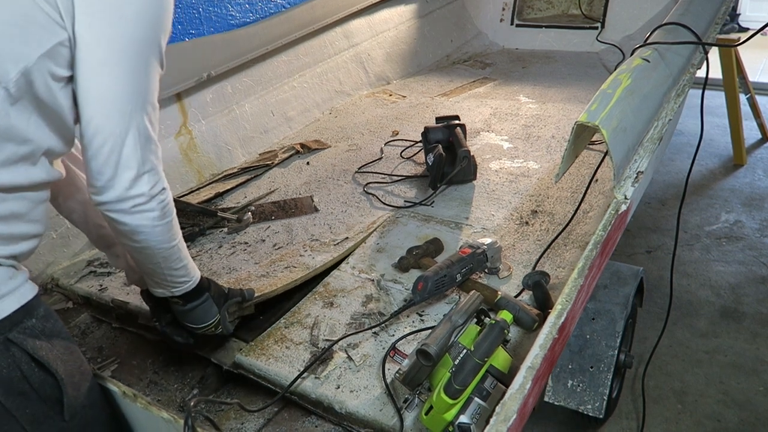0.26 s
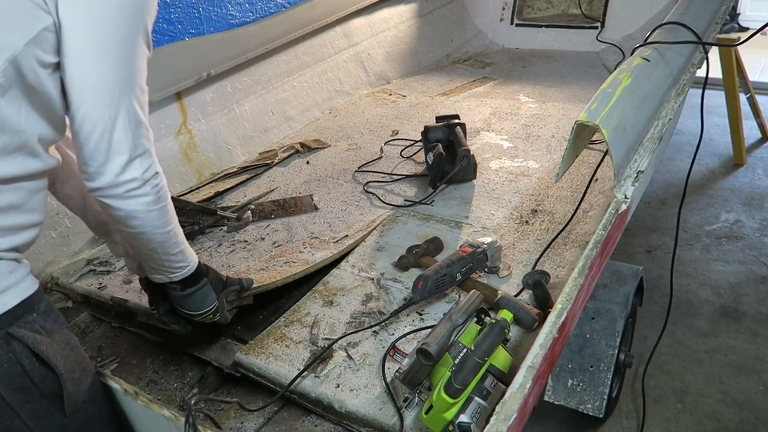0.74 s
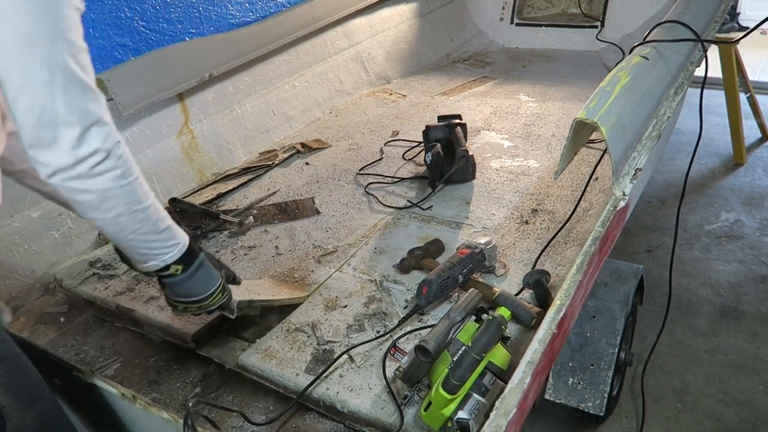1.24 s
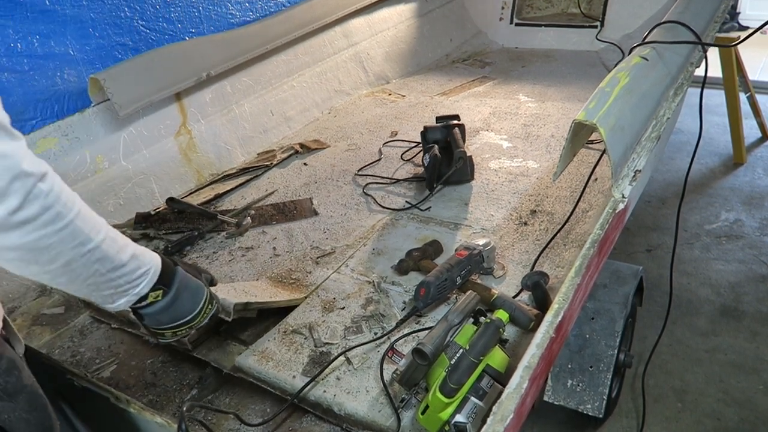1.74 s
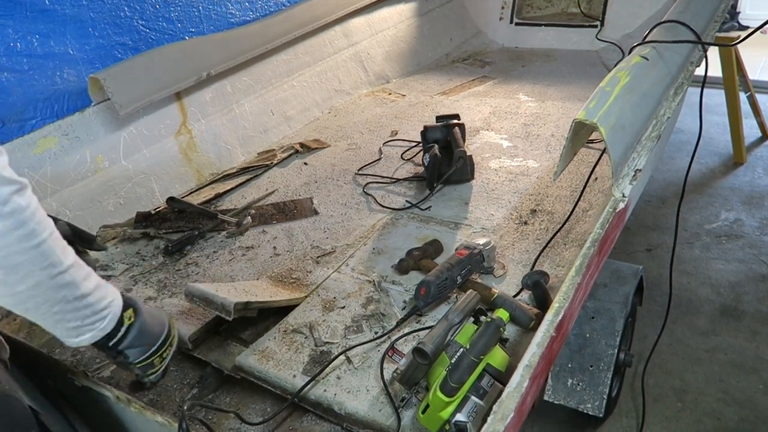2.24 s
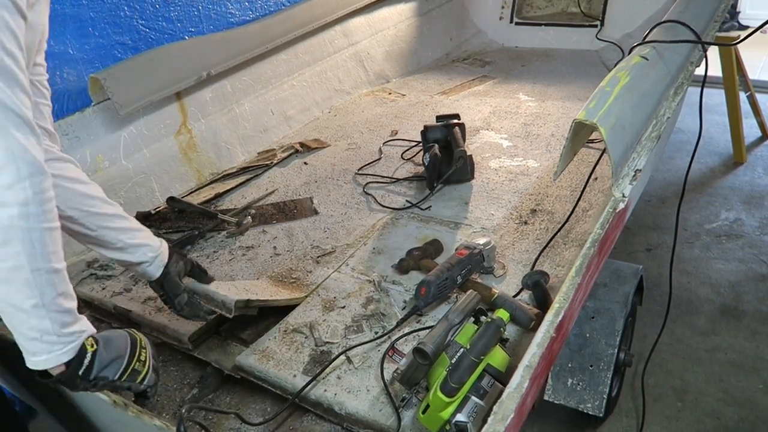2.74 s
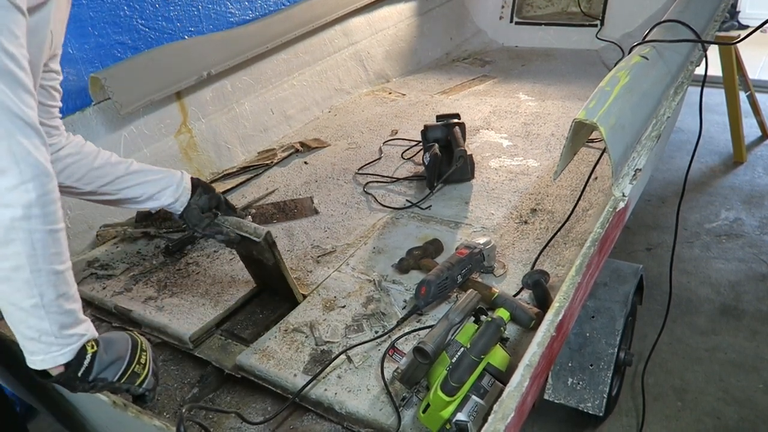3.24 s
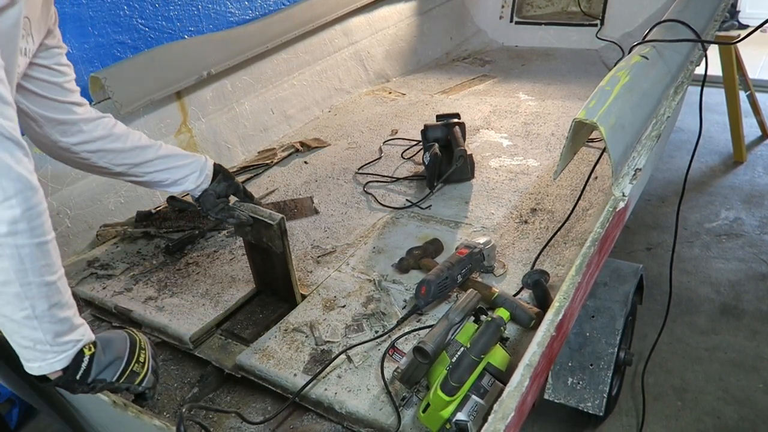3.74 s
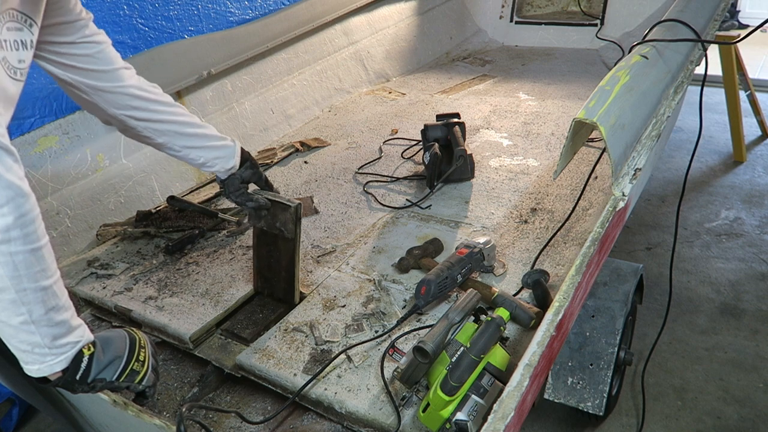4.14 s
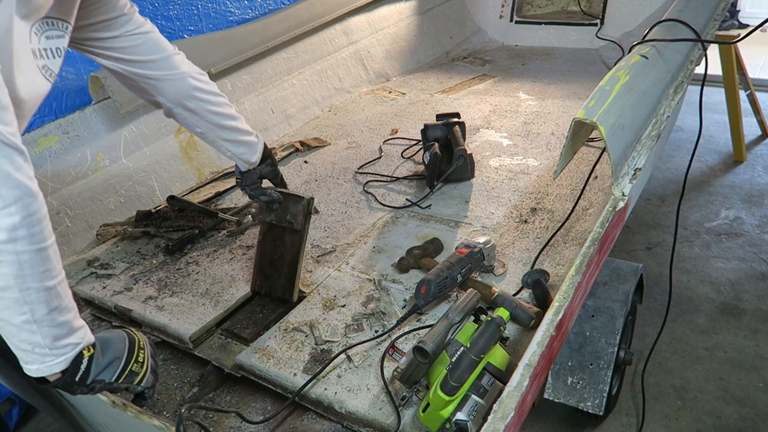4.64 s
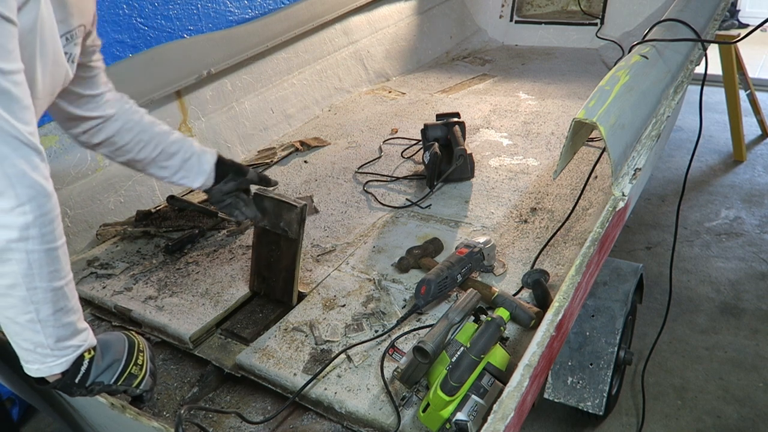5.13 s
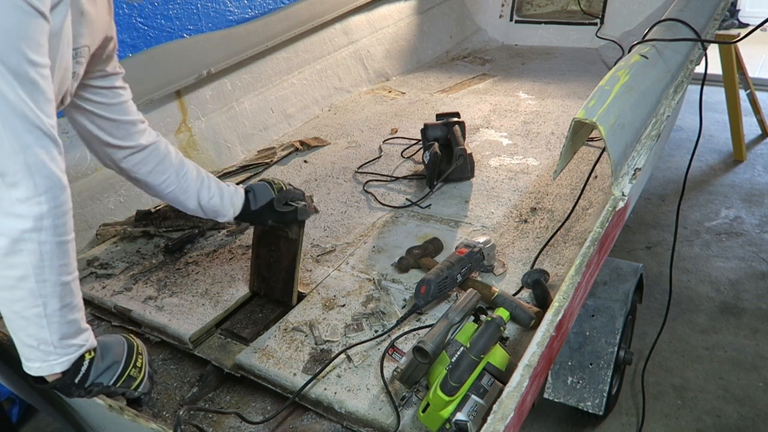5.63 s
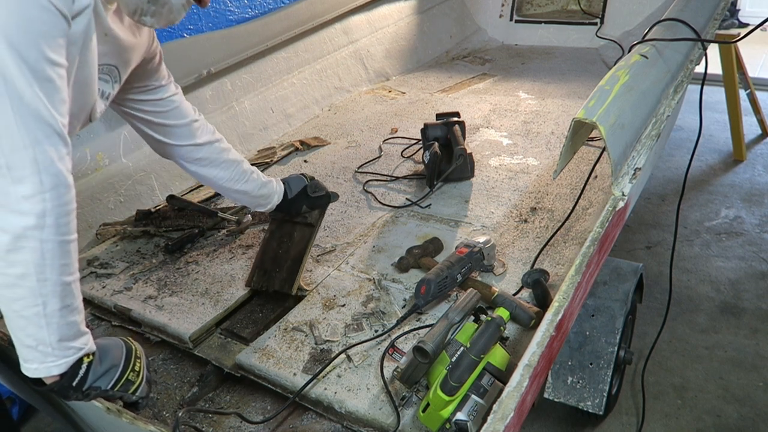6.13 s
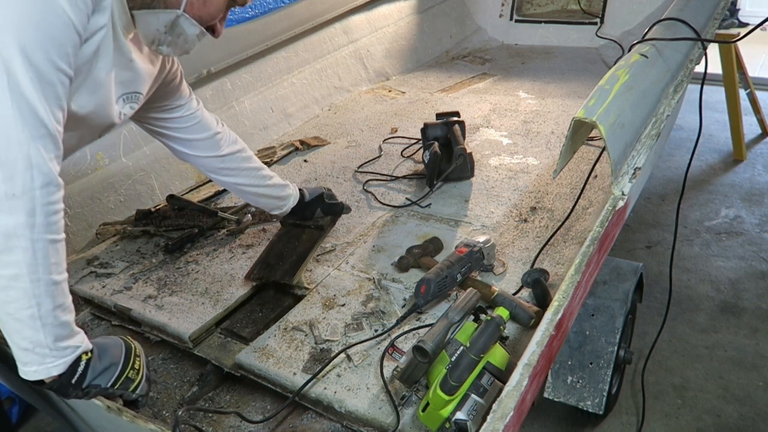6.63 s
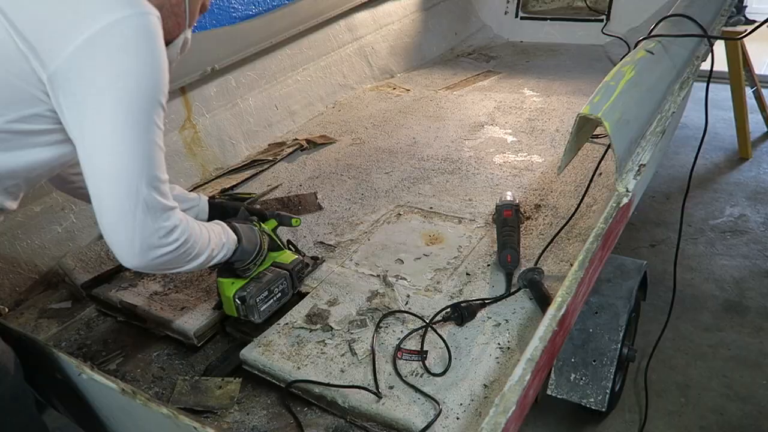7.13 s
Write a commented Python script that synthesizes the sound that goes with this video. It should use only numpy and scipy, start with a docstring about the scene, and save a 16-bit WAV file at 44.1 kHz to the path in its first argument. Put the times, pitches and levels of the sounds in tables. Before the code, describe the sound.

Rotten planks crack, splinter and tear loose from a hollow hull in a live workshop, pausing midway, then cutting to a quiet scrape.

```python
"""Prying rotten planks from a hull

Gloved hands pry deck planks out of an open hull in a bare workshop. Coloured crackle makes the tearing fibres,
short noise bursts the snaps and rips; further crackle and bursts of noise drive the resonances of the boards.
Shaped low noise makes the hull boom, decaying noise the answering walls, and sines the humming lamp.
Near the end the scene jumps to a quiet moment in which a tool is shifted on the deck.
Two close microphone ports pick it up; the loudest snaps overload them."""
import sys
import numpy as np
from scipy import signal
from scipy.fft import rfft, irfft, next_fast_len
from scipy.io import wavfile
from scipy.ndimage import uniform_filter1d, map_coordinates

SR = 44100
rng = np.random.default_rng(int(sys.argv[2]) if len(sys.argv) > 2 else 0)


def gain_from_db(level_db):
    """Turn a decibel level (scalar or array-like) into a linear amplitude factor."""
    decades = np.asarray(level_db, float) / 20
    return 10 ** decades


def pcm_store(signal):
    """Save signal as 16-bit PCM."""
    levels = np.round(np.clip(np.atleast_2d(signal), -1, 1) * 32767)
    wavfile.write(sys.argv[1], SR, levels.astype(np.int16).T)


N = 325458
TIME_S = np.arange(N) / SR

CHANGE_S = 2.0  # the hands move on from the wide plank to the short board
JUMP_S = 7.187  # the jump to the quiet moment

# Tearing and scraping, one list a bout. Each row: time in seconds, fibre level in dB, groan of the wood in dB.
TEARING_BOUTS = [
    [(0.0, -54.5, -54), (0.1, -57.5, -81), (0.2, -25, -31.5), (0.305, -46, -37), (0.35, -42.5, -24.5),
     (0.43, -51.5, -34), (0.47, -31.5, -39), (0.56, -29, -37), (0.68, -29, -28), (0.83, -49, -60),
     (0.845, -25, -37), (0.92, -25, -30), (1.0, -65, -22), (1.04, -37, -24.5), (1.1, -43.5, -33.5),
     (1.3, -54, -43.5), (1.45, -74.5, -60.5)],
    [(3.05, -62, -70), (3.14, -35.5, -36.5), (3.27, -41.5, -37.5), (3.38, -35, -32.5), (3.47, -43, -44),
     (3.55, -36.5, -39), (3.62, -41, -47), (3.68, -35, -35), (3.9, -35, -41), (3.98, -28, -31.5),
     (4.07, -26.5, -19.5), (4.12, -29, -38), (4.15, -29.5, -32), (4.39, -26.5, -21.5), (4.45, -28, -34.5),
     (4.64, -32.5, -29), (4.7, -41, -39), (4.72, -28.5, -39), (4.8, -29.5, -28.5), (4.89, -20.5, -28.5),
     (5.0, -32, -33.5), (5.15, -42.5, -63), (5.2, -28.5, -25), (5.26, -24, -27), (5.34, -37.5, -39),
     (5.49, -51, -83)],
    [(5.5, -55.5, -91), (5.78, -53.5, -42), (5.88, -58, -49), (5.95, -44.5, -28), (6.03, -26.5, -33),
     (6.14, -32.5, -29), (6.24, -19, -32), (6.29, -31.5, -28.5), (6.33, -24, -34), (6.38, -31.5, -35),
     (6.45, -28.5, -39), (6.63, -49.5, -64), (6.66, -36.5, -38.5), (6.79, -42.5, -58), (6.86, -30, -32),
     (7.02, -34, -44.5), (7.17, -28.5, -35.5)],
    [(7.2, -51, -53), (7.27, -49, -35.5), (7.316, -37.5, -54), (7.38, -45, -57)],
]
# Colour of each bout. Each row: start in seconds, treble shelf in dB, voice of the opening split in Hz,
# edge in Hz below which the fibres are thin.
BOUT_COLOURS = [(0, 4, 1900, 300), (3.0, 9, 2388, 600), (5.5, 8, 2250, 1500), (7.19, -6.5, 1807, 298.5)]
# Spectrum of parting fibres. Each row: frequency in Hz, relative density in dB per Hz.
FIBRE_SPECTRUM = [(240, -4), (400, -8.5), (445, -9.5), (569, -8), (849, -3), (2100, -12.5), (3880, -11.5),
                  (5600, -17.5), (11900, -23), (14100, -33), (15700, -49.5)]
# Bands the wood grain favours. Each row: centre in Hz, width in Hz, lift in dB.
GRAIN_BANDS = [(1660, 800, 3), (2120, 95, 4.5), (2850, 600, 1), (3600, 330, 0.5), (5300, 810, 2)]
SPLIT_WANDER_OCTAVES = 0.15

# Short snaps. Each row: start in seconds, nominal peak in dB, knock in the wood in dB against the splinters,
# splinter pitch in Hz, treble shelf in dB.
SNAPS = [(0.4419, -14.5, -23, 1580, 1.5), (0.585, -20, 2, 2000, 8.5), (0.6203, 8, -7, 2700, -3),
         (0.962, -3.5, -1, 3060, 1.9), (0.9706, 4.5, -6, 2925, -8), (0.9757, 8.5, -1.5, 2430, -12),
         (1.0392, -18.5, 13, 1150, -22), (1.1911, -37.5, -22.5, 5410, 3), (3.0733, -33, -23, 1856, 0),
         (3.4595, -22.5, -1.5, 1770, 7), (3.6365, -26, -12, 1400, 15), (3.795, -16.5, 0.5, 1420, 11),
         (3.9192, -19.5, -26, 3210, 19.5), (4.245, -13.5, -18, 2670, 15.5), (4.3998, -3, -23, 6300, 20.5),
         (4.7101, -15, -16, 2360, 16), (4.8798, -1.5, -35, 2820, 7.5), (5.0627, -17, -13, 2350, 10.5),
         (5.1979, -3.5, 2, 2970, -10), (5.5732, -36.5, -33, 4920, 6), (5.7074, -32.5, -19, 1820, 2),
         (6.2386, -6.5, -11, 2050, -5), (6.3432, -2.5, -42, 5530, 25), (6.35, -9.5, -39, 5617, 15.5),
         (6.4275, -16, -63, 3100, 15.5), (6.4332, 5, -11, 2230, -1), (6.6992, -24.5, -20, 3260, 20),
         (6.7943, -24, -24, 4450, 12.5), (6.8443, -2, -16.5, 2730, 9), (6.9656, -16.5, -23, 3150, 13.5),
         (7.0807, -5, -12, 1990, 18), (7.1302, -4, -40, 1960, 16)]
# Drawn-out rips. Each row: start in seconds, nominal peak in dB, knock in the wood in dB against the splinters,
# splinter pitch in Hz, treble shelf in dB.
RIPS = [(0.1323, -23, -23, 2300, 9.5), (0.167, -19.5, -23, 2430, -0.8), (0.1994, -7.5, -6.5, 2480, 6.5),
        (0.3149, -11.5, 6, 1140, -29.5), (0.33, -25, 16.5, 800, -30.5), (0.4561, -8.5, -30, 1486, -17),
        (0.8438, -11, 2, 1630, -0.5), (0.901, -3.5, -4, 2360, -5.5), (3.0904, -18, -10.5, 2770, 2),
        (3.1606, -27, -23, 1740, 6.5), (3.2741, -14.5, -30, 5800, -3.6), (3.3392, -21, -15, 2565, 13.5),
        (3.5259, -27, -21, 2600, 5.6), (3.686, -16, -8, 3600, 0.5), (3.7711, -21, -2.5, 1790, 12.5),
        (3.972, -11.5, 1, 2360, 1.5), (4.0173, -10.5, -4, 3140, 7.5), (4.0708, -16, -23, 3600, 1.5),
        (4.141, -8.5, -2, 1600, 13.5), (4.3077, -6.5, -4, 2120, -1.9), (4.3795, -10.5, -10, 2060, 2),
        (4.5499, -16.5, -3, 2240, 6), (4.6098, -14.5, -6, 1740, -1.5), (4.7543, -16.5, -20, 3030, -0.5),
        (4.8989, -8.5, -9, 2700, 7.5), (5.1752, -6.5, -6.4, 1813, -2), (5.8802, -38.5, 2.5, 1360, 18.5),
        (5.9, -31, 4.5, 1430, -15), (5.9554, -18, -3.5, 2850, 2.5), (6.0188, -11, -8, 2000, 5),
        (6.1801, -11.5, -37, 5800, 27), (6.4367, -8, -29, 2630, -8), (6.848, -13, -30, 5170, 8)]
# The wide plank, which breaks first. Each row: mode in Hz, width in Hz, relative level in dB.
WIDE_PLANK_MODES = [(114.8, 11, -12.5), (151, 6.7, -5.5), (233.3, 59, 2), (378, 46, 2.5), (426, 78, 2.5),
                    (583, 87, 0.5), (667.5, 69, -2.5), (860, 49, -0.5), (1160, 280, -18)]
# The short board. Each row: mode in Hz, width in Hz, relative level in dB.
SHORT_BOARD_MODES = [(170.6, 19, -9), (228.6, 27, 1), (394, 79, -1.76), (569.4, 36, -1.5), (685, 94, -9),
                     (950, 34, -10), (1208, 40, -9)]
SNAP_RISE_S, RIP_RISE_S = 0.00059, 0.0041
SNAP_FALL_S, RIP_FALL_S = 0.013, 0.055  # time for the envelope to fall by 20 dB
PLANK_THIN_HZ, BOARD_THIN_HZ = 248, 910  # below this the splinters are thin
KNOCK_EDGE_HZ = 5900  # upper edge of a knock at 0 dB treble; the break's treble moves it
CREST_DB = 2.5  # allowance for the peak of a burst over its rms
# The first hard fibre to part: level against the nominal peak, then dB gained per dB of treble
SNAP_TICK_DB, RIP_TICK_DB, TICK_FOLLOWS = -3, -3.5, 0.17

# A nail twangs as it slips in the board. Each row: start in seconds, level in dB.
NAIL_SLIPS = [(7.081, -21), (7.131, -19)]
# Partials of the nail. Each row: frequency in Hz, relative level in dB.
NAIL_PARTIALS = [(2090, 1.5), (4200, -11), (5400, -14.5)]
NAIL_DRIFT = 0.1  # radians a sample, random

# Pushes on the hull from hands, feet or a break. Each row: start in seconds, level in dB, hold in seconds.
HULL_PUSHES = [(0.0, -36.5, 0.017), (0.27, -29, .12), (0.61, -31, 0.022), (0.8, -47, 0.11),
               (0.99, -23.5, 0.023), (1.11, -27.5, 0.041), (1.3, -42, 0.045), (1.5, -55.5, 0.2),
               (2.9, -60, .05), (3.35, -44, 0.059), (4.15, -52, .2), (4.4, -41, 0.047), (4.85, -44, .03),
               (5.06, -42, 0.018), (5.28, -34.5, 0.017), (5.79, -44, 0.045), (5.98, -26, 0.033),
               (6.1, -46, 0.14), (6.54, -49, 0.037), (7.2, -37.5, 0.11)]
# Spectrum of the hull. Each row: frequency in Hz, relative density in dB per Hz.
HULL_SPECTRUM = [(19, -39), (32, -18.5), (59, 14.5), (91, 5), (140, 4.5), (160, 7.5), (210, -31),
                 (350, -120)]
PUSH_RISE_DB_PER_S, PUSH_FALL_DB_PER_S, HULL_REST_DB = 252.5, 150, -65

# Bits of rot dropping on the deck. Each row: start in seconds, click peak in dB before colouring.
CRUMBS = [(1.5191, -41.5), (1.5488, -49), (1.7205, -45.5), (1.8785, -56.5)]
# Cloth brushing. Each row: centre in seconds, level in dB, half length in seconds.
SLEEVE_BRUSHES = [(2.16, -63, .06), (2.7, -64, .045), (2.48, -72, .05)]
# Spectrum of the cloth. Each row: frequency in Hz, relative density in dB per Hz.
CLOTH_SPECTRUM = [(500, -30), (1200, -10), (2200, -5.5), (3500, -7.5), (6000, -19), (11000, -38)]

# Decay of the walls. Each row: frequency in Hz, time to fall by 60 dB in seconds.
WALL_DECAY = [(60, 1.0), (250, 0.59), (1000, 0.44), (3000, 0.4), (7000, 0.23), (14000, 0.1)]
# Left-right likeness of room and air. Each row: frequency in Hz, correlation from -1 to 1.
ROOM_LIKENESS = [(60, .93), (150, .75), (400, .75), (1200, .72), (2200, .88), (4000, .5), (8000, .05),
                 (14000, .05)]
# Lead of the left port. Each row: frequency in Hz, phase in radians.
PORT_LEAD = [(3000, 0.008), (5400, 0.21), (8000, 0.73), (11500, 1.7), (14000, 1.1)]
HALL_DB, HALL_FALL_RATIO = -30, 0.24  # far end of the hall: level, its rate of fall over that of the walls

# Level of hum and air, which sinks after the first loud snaps and creeps back.
# Each row: time in seconds, relative level in dB.
BACKGROUND_LEVEL = [(0, -50.5), (.6, -40.5), (1.0, -66.5), (1.5, -70), (2.4, -70), (3.2, -59.5),
                    (4.4, -57.5), (5.2, -56.5), (5.7, -53.5), (6.4, -57), (7.1, -64), (7.2, -49),
                    (7.38, -48)]
# Partials of the hum. Each row: frequency in Hz, relative level in dB.
HUM_PARTIALS = [(51, -4.5), (100, 1.5), (200, -5), (377, -16.5), (400, -24), (455, -23), (609, -16.5)]
# Spectrum of the far air. Each row: frequency in Hz, relative density in dB per Hz.
AIR_SPECTRUM = [(22, -38.5), (38, -14), (97, -12), (152, -18), (209, -10), (289, -17.5), (549, -20.5),
                (606, -21), (836, -24.5), (7180, -42), (14000, -62)]


def unit(x):
    """Scales a signal to rms 1."""
    return x / np.sqrt(np.mean(x ** 2) + 1e-20)


def along(points, hz):
    """Reads (Hz, value) points on a log frequency axis."""
    f, v = np.transpose(points)
    return np.interp(np.log(hz + 1), np.log(f + 1), v)


def curves(rows, outside=None):
    """Gives one value per sample for each column after the time."""
    s, *columns = np.transpose(rows)
    return np.array([np.interp(TIME_S, s, column, outside, outside) for column in columns])


def wobble(rate):
    """Draws a smooth random curve with rate knots a second."""
    knots = rng.standard_normal(int(N * rate / SR) + 4)
    return map_coordinates(knots, [np.arange(N) * rate / SR])


def filtered(x, response):
    """Multiplies the spectrum of x by a complex response of frequency."""
    n = x.shape[-1]
    m = next_fast_len(n + 8192)
    return irfft(rfft(x, m) * response(np.fft.rfftfreq(m, 1 / SR)), m)[..., :n]


def shaped(x, spectrum):
    """Colours noise with a spectrum table."""
    return filtered(x, lambda f: gain_from_db(along(spectrum, f)))


def paired(x, alike):
    """Mixes two unrelated signals into a left and right of the given likeness."""
    def mid_side(hz):
        turn = np.arccos(np.clip(along(alike, hz), -1, 1)) / 2
        return np.array([np.cos(turn), np.sin(turn)])
    mid, side = filtered(x, mid_side)
    return np.array([mid + side, mid - side])


def mode(f, hz, width):
    """Response of one causal resonance, with gain 1 at its centre."""
    return 1j * f * width / (hz * hz - f * f + 1j * f * width)


def body(modes):
    """Response of the bending modes of a piece of wood, with alternating signs."""
    return lambda f: sum((-1) ** k * gain_from_db(db) * mode(f + 1, hz, width)
                         for k, (hz, width, db) in enumerate(modes))


def lift(f):
    """Lift in dB of the bands that the wood grain favours."""
    return sum(db / (1 + (2 * (f - hz) / width) ** 2) for hz, width, db in GRAIN_BANDS)


def treble(f, db):
    """Gain of a soft shelf that reaches db well above 4500 Hz."""
    return gain_from_db(db / (1 + (4500 / (f + 1)) ** 3))


def crackle(per_s, spread_db, smooth):
    """Fibres part at random instants with uneven strengths, in clumps, over a share of plain rubbing."""
    clump = gain_from_db(4.4 * wobble(40))
    parting = rng.random(N) < per_s * clump / SR
    strength = np.minimum(rng.exponential(size=N), 3)
    grains = unit(parting * gain_from_db(spread_db * strength) * rng.standard_normal(N))
    rubbing = smooth * gain_from_db(1.5 * wobble(70)) * rng.standard_normal(N)
    return unit(grains + rubbing)


def ticks(rows, low_hz):
    """Dry noise clicks that fall 20 dB in 1.5 ms, thinned below low_hz and dulled above 11 kHz."""
    out, t = np.zeros(N), np.arange(176) / SR
    for s, db in rows:
        click = gain_from_db(-20 * t / 0.0015) * rng.standard_normal(len(t))
        out[round(s * SR):][:len(t)] += gain_from_db(db) * click / np.abs(click).max()
    return filtered(out, lambda f: 1j * f / (low_hz + 1j * f) / (1 + 1j * f / 11000))


def tearing():
    """Crackle coloured by grain and opening split; a second crackle, with its own level, sounds the wood modes."""
    fibre_db, groan_db = np.max([curves(bout, outside=-150) for bout in TEARING_BOUTS], axis=0)
    since, treble_db, split_hz, thin_hz = np.transpose(BOUT_COLOURS)
    bout = np.searchsorted(since, TIME_S, side='right') - 1
    split_hz = split_hz[bout] * 2 ** (SPLIT_WANDER_OCTAVES * wobble(12))

    f, t, z = signal.stft(crackle(per_s=2500, spread_db=1.0, smooth=0.6), SR, nperseg=256)
    f, at = f[:, None], np.minimum(t * SR, N - 1).astype(int)
    split_db = 8 / (1 + ((f - split_hz[at]) / 450) ** 2)
    # the colour wanders in patches of time and frequency
    patches = uniform_filter1d(rng.standard_normal(z.shape), 4, axis=0)
    patches_db = 3.5 * unit(uniform_filter1d(patches, 12, axis=1))
    colour = gain_from_db(along(FIBRE_SPECTRUM, f) + lift(f) + split_db + patches_db)
    colour = colour * treble(f, treble_db[bout[at]])
    colour = colour / (1 + (thin_hz[bout[at]] / (f + 1)) ** 2)
    colour /= np.sqrt(np.mean(colour[6:30] ** 2, axis=0))  # the middle band carries the level
    fibres = unit(signal.istft(z * colour, SR, nperseg=256)[1][:N])

    rubbing = crackle(per_s=800, spread_db=6.5, smooth=0.9)
    plank = unit(filtered(rubbing, body(WIDE_PLANK_MODES)))
    board = unit(filtered(rubbing, body(SHORT_BOARD_MODES)))
    groan = np.where(np.arange(N) < CHANGE_S * SR, plank, board)
    return gain_from_db(fibre_db) * fibres + gain_from_db(groan_db) * groan


def snaps():
    """Each break is a swelling, dying burst of splinters that rings at its own pitch and knocks the wood.

    Row 0 is direct; row 1 feeds the walls, the same energy and colour without the grain of the burst."""
    wood, t = np.zeros((2, N + SR)), np.arange(SR // 6) / SR
    breaks = [(*row, SNAP_RISE_S, SNAP_FALL_S) for row in SNAPS]
    breaks += [(*row, RIP_RISE_S, RIP_FALL_S) for row in RIPS]
    for s, db, knock_db, hz, treble_db, rise, fall in breaks:
        wide = s < CHANGE_S
        modes = WIDE_PLANK_MODES if wide else SHORT_BOARD_MODES
        thin_hz = PLANK_THIN_HZ if wide else BOARD_THIN_HZ
        swell = (1 - np.exp(-t / rise)) * gain_from_db(-20 * (t / fall) ** 0.51)
        # splinters part unevenly, in lumps of 64 samples
        lumps = gain_from_db(3 * np.repeat(rng.standard_normal(len(t) // 64 + 1), 64)[:len(t)])
        burst = rng.standard_normal((2, len(t))) * swell * lumps
        blow = np.linalg.norm(burst[0]) * (np.arange(len(t)) == round(0.2 * fall * SR))

        def splinter_colour(f):
            fibre = gain_from_db(along(FIBRE_SPECTRUM, f) + lift(f)) * treble(f, treble_db)
            ring = 1 + 1.8 * mode(f, hz, 420)
            return fibre * ring * (1j * f / (thin_hz + 1j * f)) ** 2

        def knock_colour(f):
            return body(modes)(f) / (1 + 1j * f / (KNOCK_EDGE_HZ * gain_from_db(treble_db)))

        crack = filtered(np.array([burst[0], blow]), splinter_colour)
        knock = filtered(np.array([burst[1], blow]), knock_colour)
        both = crack / np.linalg.norm(crack[0]) + gain_from_db(knock_db) * knock / np.linalg.norm(knock[0])
        wood[:, round(s * SR):][:, :len(t)] += gain_from_db(db - CREST_DB) * np.linalg.norm(swell) * both
    return wood[:, :N]


def first_fibres():
    """Every break opens with one hard fibre parting, a click that is louder in a bright break."""
    rows = []
    for kind, over_db in ((SNAPS, SNAP_TICK_DB), (RIPS, RIP_TICK_DB)):
        for s, db, _, _, treble_db in kind:
            rows.append((s, db + over_db + TICK_FOLLOWS * treble_db))
    return ticks(rows, low_hz=2000)


def nail():
    """A slipping nail gives short steel notes: decaying sines whose phase drifts at random."""
    twang, t = np.zeros(N + SR), np.arange(SR // 3) / SR
    for s, db in NAIL_SLIPS:
        for hz, level_db in NAIL_PARTIALS:
            drift = np.cumsum(rng.standard_normal(len(t))) * NAIL_DRIFT
            decay = gain_from_db(db + level_db - 60 * t / 0.15)
            twang[round(s * SR):][:len(t)] += decay * np.sin(2 * np.pi * hz * t + drift)
    return twang[:N]


def boom():
    """The hollow hull rumbles when it is leaned on: each push swells, holds and dies away."""
    power = gain_from_db(2 * HULL_REST_DB)
    for s, db, held in HULL_PUSHES:
        rise_db = PUSH_RISE_DB_PER_S * np.maximum(s - TIME_S, 0)
        fall_db = PUSH_FALL_DB_PER_S * np.maximum(TIME_S - s - held, 0)
        power = power + gain_from_db(2 * (db - rise_db - fall_db))
    shake = shaped(rng.standard_normal((2, N)), HULL_SPECTRUM)
    return np.sqrt(power) * unit(paired(shake, [(60, 0.95)]))


def stirring():
    """Between the pulls, crumbs tick down as clicks and a sleeve brushes as swelling, coloured crackle."""
    swell = sum(gain_from_db(db) * np.exp(-((TIME_S - s) / half) ** 2) for s, db, half in SLEEVE_BRUSHES)
    brush = unit(shaped(crackle(per_s=2600, spread_db=4.0, smooth=1.88), CLOTH_SPECTRUM))
    return ticks(CRUMBS, low_hz=3500) + swell * brush


def workshop(x):
    """Hull sides flash back treble, walls decay by frequency and the far end of the hall lingers.

    A fresh noise tail every quarter second lets the answer change as the hands move about."""
    wet, step = np.zeros((2, N + 2 * SR)), SR // 4
    sounding = np.flatnonzero(x)
    for start in range(sounding[0], sounding[-1], step):
        hz, t, z = signal.stft(rng.standard_normal((2, SR)), SR, nperseg=256)
        hz = hz[:, None]
        fall_db = -60 * t / along(WALL_DECAY, hz)
        sides = gain_from_db(16.5 - 60 * t / 0.025) / (1 + (6500 / (hz + 1)) ** 3)
        hall = gain_from_db(HALL_DB + HALL_FALL_RATIO * fall_db)
        tail = signal.istft(z * (sides + gain_from_db(fall_db) + hall), SR, nperseg=256)[1]
        tail = tail / np.linalg.norm(tail[0])
        answer = signal.fftconvolve(x[None, start:start + step], tail, axes=1)
        wet[:, start + 130:][:, :answer.shape[1]] += answer  # about 3 ms of pre-delay
    return paired(wet[:, :N], ROOM_LIKENESS)


def heard(x):
    """Row 0 arrives directly, its treble leading in phase at the left port; row 1 goes through the room."""
    sides = np.array([[1], [-1]])
    direct = filtered(x[0], lambda f: np.exp(0.5j * along(PORT_LEAD, f) * sides))
    return direct + gain_from_db(-3.0) * workshop(x[1])


def background():
    """A slightly unsteady mains hum of sines over far air, which is shaped noise."""
    hum = np.zeros(N)
    for hz, db in HUM_PARTIALS:
        level = gain_from_db(db + 9.0 + 1.4 * wobble(6))
        hum += level * np.sin(2 * np.pi * hz * TIME_S + 0.43 * wobble(5.0))
    air = unit(paired(shaped(rng.standard_normal((2, N)), AIR_SPECTRUM), ROOM_LIKENESS))
    return gain_from_db(curves(BACKGROUND_LEVEL)[0]) * (hum + gain_from_db(4.0 + 1.5 * wobble(6.4)) * air)


def scene():
    """Mixes all layers; the jump in time cuts off whatever wood and room sound still rings."""
    rubbed = tearing()
    before = np.arange(N) < JUMP_S * SR
    wood = snaps() + (rubbed + first_fibres() + nail() + stirring())
    prying = heard(wood * before) * before
    tool = heard(np.array([rubbed, rubbed]) * ~before)
    return prying + tool + boom() + background()


def top_cut(x):
    """Nothing passes above the cut-off."""
    return signal.sosfilt(signal.butter(12, 15820, fs=SR, output="sos"), x)


def record(dry):
    """The microphone drops the deepest bass and highest treble; the loudest snaps flatten at full scale."""
    x = filtered(dry, lambda f: (1j * f / (37 + 1j * f)) ** 2 * (f < 15900))
    mix = x / (1 + np.abs(x) ** 10) ** (1 / 10)
    return top_cut(mix)


dry = scene()
out = record(dry)
pcm_store(out)
```